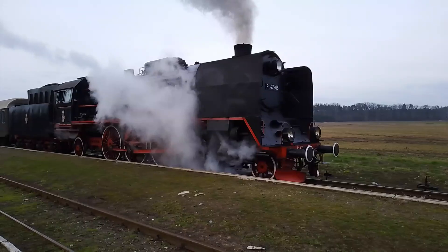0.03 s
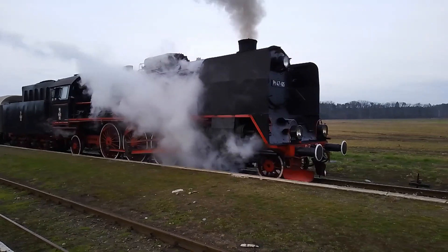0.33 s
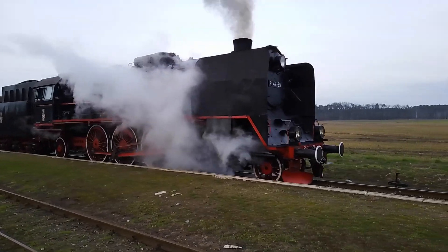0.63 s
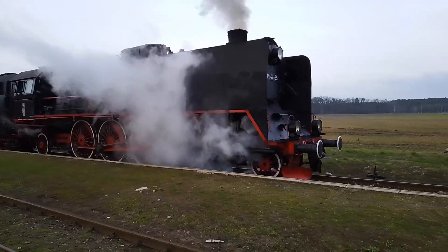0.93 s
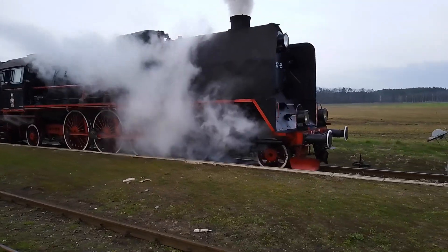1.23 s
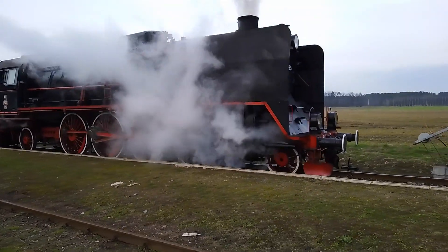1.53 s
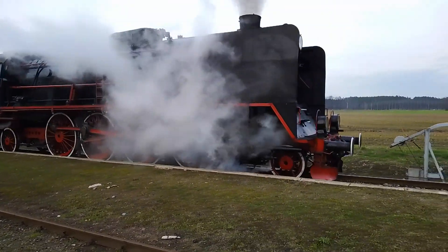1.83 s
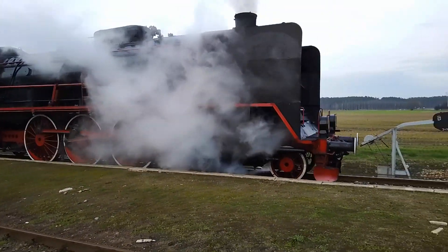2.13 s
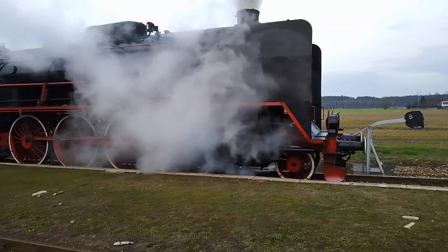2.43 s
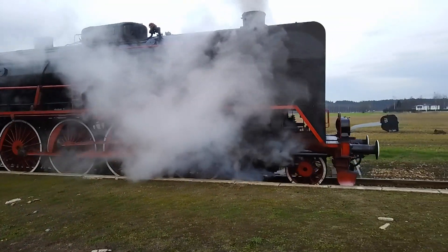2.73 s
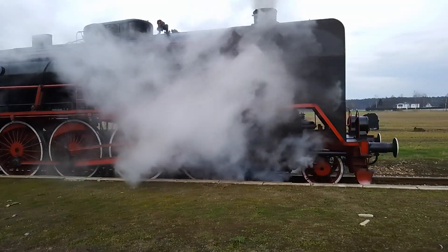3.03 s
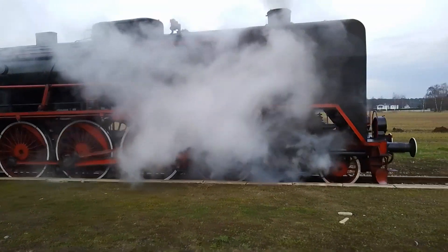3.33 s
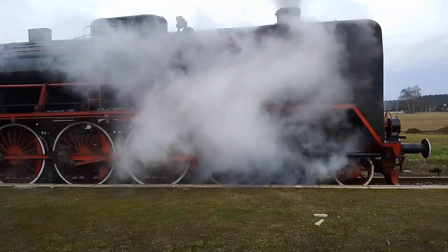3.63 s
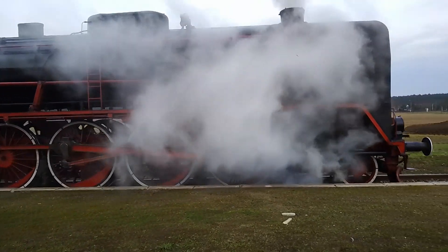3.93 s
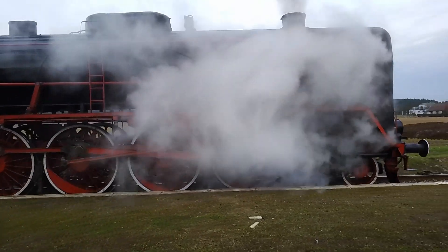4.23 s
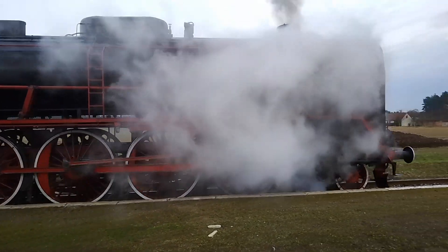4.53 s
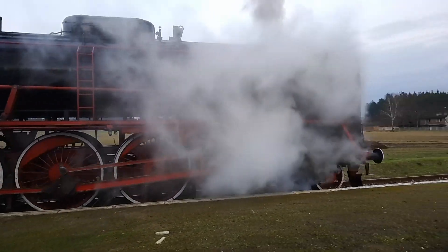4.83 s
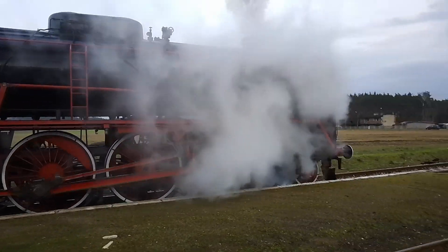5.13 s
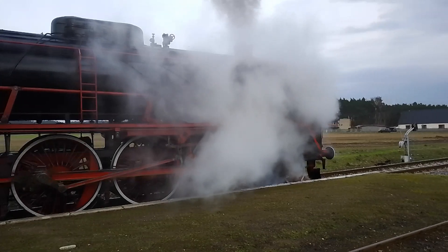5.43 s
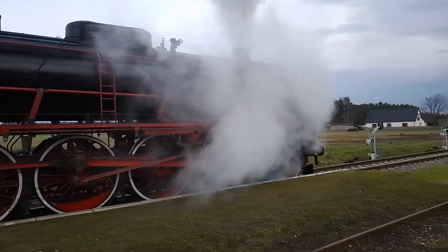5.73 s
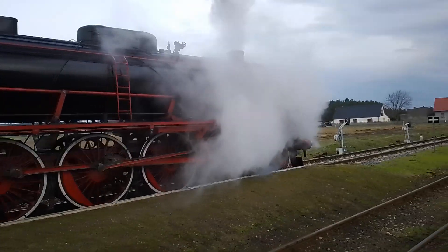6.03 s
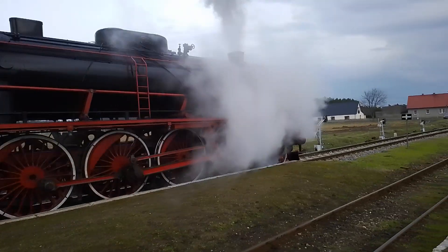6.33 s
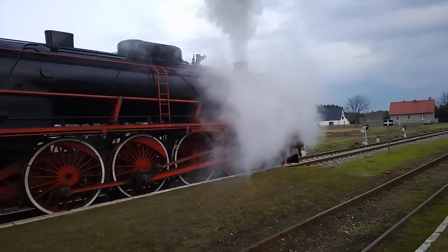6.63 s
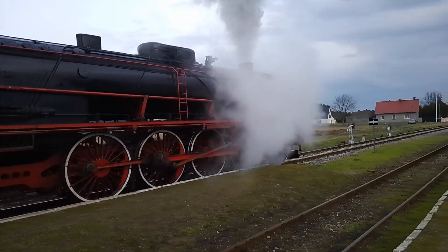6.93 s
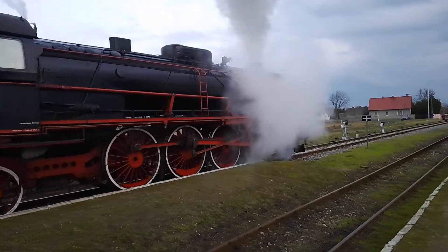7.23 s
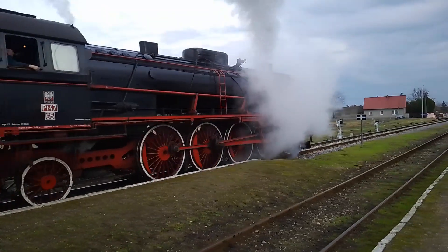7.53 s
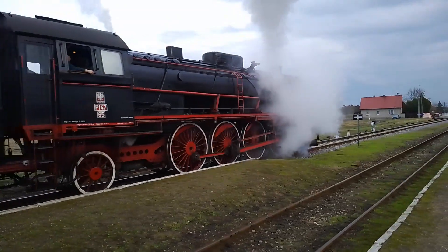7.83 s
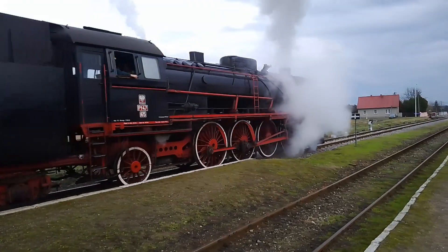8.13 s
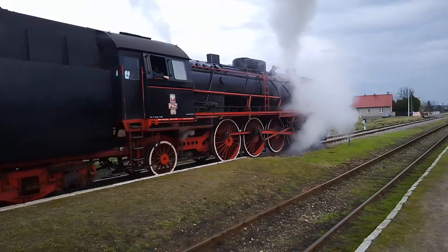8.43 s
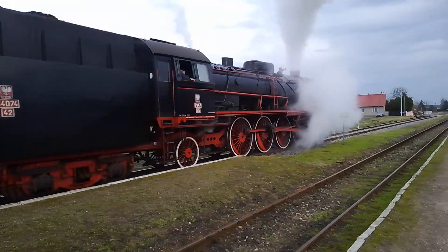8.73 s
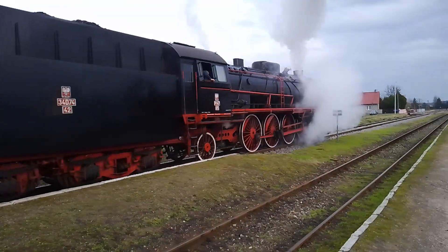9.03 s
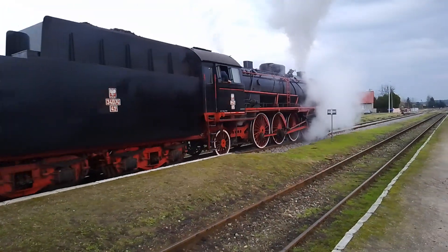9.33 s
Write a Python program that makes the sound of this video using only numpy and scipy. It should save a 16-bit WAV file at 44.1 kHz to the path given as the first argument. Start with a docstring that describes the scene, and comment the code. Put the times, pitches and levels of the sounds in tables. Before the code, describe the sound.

After silence, a shrill, sputtering hiss of steam cuts in abruptly at about 0.9 seconds, from a steam locomotive close by. At 1.2 seconds the chimney begins to chuff, each beat a low boom with a hollow bark and a slight rasp. The beats fall in slightly uneven groups of four, about two thirds of a second apart at first, quickening to about three a second by 7 seconds. The hiss pulses with each chuff and surges with a broader roar every fourth beat. Wheels and rods rumble softly underneath, strongest around 4 seconds. Small spits of steam slip between beats, for example near 4.3, 6.8 and 8.9 seconds. From about 5.5 seconds the chuffs turn boomier as the engine passes, and the hiss gradually fades and dulls, still surging. The chuffs soften from 8.6 seconds and continue to around 9.6 seconds.

```python
"""A steam locomotive pulls away past a platform with its cylinder drain cocks open. After just under a second
of silence the sound cuts in, already full of shrill hiss. The chimney starts to chuff, four uneven beats to a
turn of the wheels; the hiss pulses with each beat and surges once a turn. The beats come ever faster, with
small spits of steam between them and the running gear rumbling below. Past the middle the chimney is heard from
behind, and the hiss fades as the engine draws away."""
import sys
import numpy as np
from scipy import signal
from scipy.fft import rfft, irfft, next_fast_len
from scipy.io import wavfile
from scipy.ndimage import uniform_filter1d, map_coordinates

SR = 44100
rng = np.random.default_rng(int(sys.argv[2]) if len(sys.argv) > 2 else 0)


def to_wav(sig):
    """Store sig (one row per channel, or 1-D mono) as 16-bit WAV at the path in sys.argv[1].

    Samples outside -1..1 are clipped; the rate is SR.
    """
    pcm = np.clip(np.atleast_2d(sig), -1, 1) * 32767
    pcm = np.round(pcm).astype(np.int16)
    wavfile.write(sys.argv[1], SR, pcm.T)  # frames by channels


N = 422478
TIME = np.arange(N) / SR

# The colours of a chuff: low boom and mid bark, each from the front and from behind, and a rasp on top.
# Each row: frequency in Hz, relative level in dB.
BOOM_FRONT = [(30, -39), (70, -16.5), (100, -21), (135, -5.5), (162, -15), (186, -1.5), (240, 1.5),
              (310, 1), (355, 6.5), (400, -10.5), (520, -34)]
BOOM_REAR = [(30, -60), (70, -15), (110, -24), (140, -28), (163, -38), (195, -7), (250, 3.5), (310, 6.5),
             (355, -4), (400, -5.5), (520, -28)]
BARK_FRONT = [(330, -41), (420, -4.5), (480, 0.5), (540, 1), (605, 1), (660, -1.5), (720, 0.5),
              (790, -10.5), (880, -12.5), (1100, -48)]
BARK_REAR = [(330, -38), (420, -14), (480, -1), (530, -4), (595, -0.5), (640, 0.5), (700, 1.5), (790, -8.5),
             (880, -13), (1100, -51)]
RASP = [(750, -41), (920, -0.5), (1010, 2), (1110, 3.5), (1220, 3), (1400, -4.5), (1800, -7.5),
        (2400, -12.5), (5000, -39)]
# The chimney's ring. Each row: pitch in Hz, width in Hz, relative level in dB, loudest moment in
# seconds, spread around it in seconds.
CHIMNEY_MODES = [(347.7, 13, -6, 3.56, 1.3), (302, 57, -6, 2.4, 0.54), (191, 15, -8.5, 4.68, 0.74),
                 (234, 35, -8, 5.8, 1.14), (272, 20, -3, 6.5, 1.03), (335, 54, -2.5, 8.97, 1.16),
                 (116, 37, -21.5, 8.65, 0.77), (615, 23, -8, 6.3, 0.98), (1015, 25, -18.5, 2.3, 3.1),
                 (1197, 16, -17.5, 6.63, 0.45)]


def chimney():
    """Each blast barks and rasps at the mouth and booms longer in the smokebox."""
    boom, bark, rasp = np.zeros((3, N))
    for start, open_s, db, boom_db, rasp_db in strokes():
        slowness = (4.5 / (start + 1)) ** 0.17  # the valves move faster as the engine gains speed
        boom += amp(db + boom_db) * beat(start + .001, open_s, .025 * slowness, .08 * slowness, 1.8)
        bark += amp(db) * beat(start, open_s, .018 * slowness, .061 * slowness, sag_db=4.5)
        rasp += amp(db + rasp_db) * beat(start + .016, open_s * .92, .025, .071, sag_db=4)
    behind = np.pi / 4 * (1 + np.tanh((TIME - 5.6) / 0.42))  # the view turns from front to rear
    turning = lambda front, rear: np.cos(behind) * noise(front) + np.sin(behind) * noise(rear)
    flutter = amp(0.4 * wobble(55))  # the blast tears into puffs
    boom *= amp(0.56 * np.sin(behind))  # the smokebox booms more from behind
    boom *= amp(-3) * turning(BOOM_FRONT, BOOM_REAR) + lobes(CHIMNEY_MODES)
    bark *= amp(-1.1) * turning(BARK_FRONT, BARK_REAR)
    rasp *= amp(-1.64) * patchy(noise(RASP), depth_db=4)
    return flutter * (boom + bark + rasp)


# The quickening exhaust beats. Each row: start in seconds, relative level in dB.
CHUFFS = [(1.226, -21), (1.88, -20), (2.502, -21), (3.078, -19), (3.614, -19), (4.074, -20.5), (4.534, -20),
          (4.981, -19.5), (5.42, -19.3), (5.803, -20), (6.18, -20), (6.572, -19.8), (6.96, -18.5),
          (7.291, -21), (7.637, -21.5), (7.984, -19), (8.336, -20), (8.646, -24), (8.957, -24.5),
          (9.28, -24), (9.607, -23)]
# The four strokes of a wheel turn, set unevenly by the valves. Each row: open time in seconds at the
# usual gap between beats, boom trim in dB, rasp trim in dB.
STROKES = [(.11, -1.5, -6), (0.094, -1, -6.5), (0.088, 0.17, -6.5), (0.072, -0.3, -6)]
USUAL_GAP_S = 0.42


def strokes():
    """The valves' rhythm: start, open time, level, boom trim and rasp trim for every beat."""
    starts, levels_db = np.transpose(CHUFFS)
    open_s, boom_db, rasp_db = np.transpose([STROKES[k % len(STROKES)] for k in range(len(starts))])
    open_s = open_s * (np.gradient(starts) / USUAL_GAP_S) ** 0.64  # slow beats stay open longer
    rasp_db = rasp_db - 0.15 * starts  # the rasp fades as the chimney turns away
    return list(zip(starts, open_s, levels_db, boom_db, rasp_db))


def beat(start, open_s, rise_s, fall_s, sag_db):
    """The envelope of one stroke: the valve slides open, the pressure sags, the blast dies away."""
    age = TIME - start
    opening = .5 + .5 * np.tanh(0.73 * (age / rise_s + 0.9))
    sag = amp(sag_db * (.5 - np.clip(age / open_s, 0, 1)))
    dying = np.exp(-np.maximum(age - open_s, 0) / fall_s)
    return opening * sag * dying


# The colours of the jets: piercing hiss, broad roar and airy spray.
# Each row: frequency in Hz, relative level in dB.
SHRILL = [(4500, -48), (5600, -20.5), (6700, -14), (8000, -11.5), (8700, -7), (9150, -3), (9500, -3),
          (9800, -4), (10150, -5), (10800, -10), (11600, -16.5), (13000, -29)]
ROAR = [(300, -2.5), (800, -6), (1400, 0.5), (2000, 0), (2700, -0.5), (3600, 0.5), (5000, -2.5),
        (6500, -7.5), (9000, -1), (13000, -34)]
SPRAY = [(7000, -35), (11000, -26), (12300, 0.5), (14000, -2), (15000, -4.5), (16000, 3)]
# The nozzles' ring. Each row: pitch in Hz, width in Hz, relative level in dB, loudest moment in
# seconds, spread around it in seconds.
NOZZLE_MODES = [(1850, 100, -23.5, 4.5, 2.9), (2750, 550, -17, 2.95, 0.4), (3490, 150, -22.5, 2.9, 2.3),
                (3740, 270, -20, 5.04, 0.29), (4190, 140, -24, 4.15, 0.27), (5250, 1700, -16, 1.7, 0.48),
                (6570, 610, -18, 6.7, 1.5), (8770, 140, -8, 1, .4), (9300, 220, -8, 1.2, 0.5),
                (10260, 320, -9.5, 2.2, 0.8), (9610, 340, -4, 4.06, 0.27), (9100, 220, -12, 4.4, 0.28),
                (9160, 410, -6, 10, 1.8)]


def drain_cocks():
    """Wet steam shrills in the narrow nozzles, roars as it spreads and throws a fine spray."""
    hiss_db = cock_level()
    nozzles = amp(-0.27) * patchy(noise(SHRILL), depth_db=1.47) + lobes(NOZZLE_MODES)
    shrill = amp(hiss_db - 0.25) * nozzles
    # the louder the hiss, the brighter it sounds: the roar follows it less, the top treble slightly more
    roar_db = 0.73 * hiss_db - 16.5 + surge()  # the surge widens the jet
    roar = amp(roar_db) * patchy(noise(ROAR), depth_db=1.32)
    shade_db = 3 * np.maximum(TIME - 6.3, 0)  # the top treble fades as the cylinders draw away
    spray = amp(1.07 * hiss_db - 10 - shade_db) * patchy(noise(SPRAY), depth_db=1.5)
    sputter = amp(0.4 * wobble(30) + 0.3 * wobble(170))  # slugs of water break up the jets
    return sputter * (shrill + roar + spray)


# The steady leak as the cocks come near and draw away. Each row: time in seconds, relative level in dB.
LEAK_LEVELS = [(.9, -23.5), (2.6, -22.5), (3.4, -22.5), (4.2, -23), (5, -25), (5.8, -25.5), (7.3, -30.5),
               (8.6, -34.5), (9.5, -39.5)]


def cock_level():
    """The hiss's drive in dB: a steady leak that surges with the crank, and a pulse on every beat."""
    surge_db = 1.73 + 0.86 * TIME  # the surge grows as the jet swings toward the listener
    leak = amp(curve(LEAK_LEVELS) + surge_db * surge())
    pulses = sum(beat(start + .011, open_s, rise_s=.025, fall_s=.037, sag_db=4)
                 for start, open_s, *_ in strokes())
    return 20 * np.log10(np.hypot(leak, amp(-26.5) * pulses))


def surge(lag_beats=.27, rise_beats=.19, length_beats=2.7):
    """Once a turn the near cylinder fills quickly and empties slowly: a swell between 0 and 1."""
    starts = np.transpose(CHUFFS)[0]
    beat_count = np.interp(TIME, starts, np.arange(len(starts)))
    age_beats = (beat_count - lag_beats) % len(STROKES)
    return np.minimum(age_beats / rise_beats, 1) * np.maximum(1 - age_beats / length_beats, 0)


# Spits and puffs between the beats. Each row: start in seconds, open time in seconds, centre in Hz,
# width in Hz, level in dB.
PUFFS = [(2.39, 0.068, 334, 250, -37.5), (4.268, 0.098, 1744, 650, -32.5), (5.292, 0.014, 600, 500, -36),
         (6.392, 0.024, 796, 300, -35), (6.78, .07, 9700, 2000, -27), (8.458, .07, 3940, 900, -42),
         (8.869, 0.021, 648, 500, -29.5)]


def puffs():
    """Short bursts of escaping steam, each swelling a little before it stops."""
    return sum(amp(db) * beat(start, open_s, rise_s=.0096, fall_s=.013, sag_db=-4) * resonance(hz, width)
               for start, open_s, hz, width, db in PUFFS)


# The running gear rolling by. Each row: time in seconds, level in dB.
GEAR_LEVELS = [(1, -47), (2.4, -37.5), (3.3, -42), (4.2, -32.5), (5.1, -39), (5.7, -35.5), (6.7, -38.5),
               (8.6, -36.5), (9.5, -41.5)]
# The colour of its rumble. Each row: frequency in Hz, relative level in dB.
RUMBLE = [(20, -38), (60, -16.5), (125, -9.5), (160, -12.5), (190, -4), (275, 2), (350, -3), (420, -5),
          (540, -6.5), (680, -1.5), (950, -8.5), (1300, -10.5), (2000, -13), (3500, -20)]


def running_gear():
    """Wheels and rods rumble unevenly along the rails."""
    return amp(curve(GEAR_LEVELS) + 0.33 * wobble(22)) * patchy(noise(RUMBLE), depth_db=3)


def lobes(modes):
    """Resonances beam out in lobes that sweep over the listener: each swells and fades in passing."""
    return sum(amp(db) * np.exp(-.5 * ((TIME - peak_s) / spread_s) ** 2) * resonance(hz, width)
               for hz, width, db, peak_s, spread_s in modes)


def resonance(hz, width_hz):
    """Turbulence of rms 1 ringing in one resonance."""
    return turbulence(lambda f: 1 / (1 + ((f - hz) / (0.54 * width_hz)) ** 2))


def noise(spectrum):
    """Turbulence of rms 1, coloured by rows of frequency in Hz and level in dB."""
    hz, db = np.transpose(spectrum)
    return turbulence(lambda f: amp(np.interp(np.log(f + 1), np.log(hz), db, left=-120, right=-120)))


def turbulence(response):
    """White noise shaped by a frequency response, at rms 1."""
    size = next_fast_len(N + 8192)
    white = rfft(rng.standard_normal(N), size)
    return unit(irfft(white * response(np.fft.rfftfreq(size, 1 / SR)), size)[:N])


def patchy(sound, depth_db):
    """Eddies in the steam cloud brighten and shade patches of the spectrum."""
    spectrogram = signal.stft(sound, nperseg=512)[2]
    eddies = uniform_filter1d(rng.standard_normal(spectrogram.shape), size=4, axis=0)  # across pitch
    eddies = uniform_filter1d(eddies, size=16, axis=1)  # across time
    return unit(signal.istft(spectrogram * amp(depth_db * unit(eddies)), nperseg=512)[1][:N])


def wobble(rate):
    """A smooth random curve, rate knots a second."""
    return map_coordinates(rng.standard_normal(int(N * rate / SR) + 4), [TIME * rate])


def curve(rows):
    """A fader ride through rows of time and level, one value per sample."""
    return np.interp(TIME, *np.transpose(rows))


def amp(db):
    """Decibels to gain."""
    return 10 ** (np.asarray(db) / 20)


def unit(x):
    """Scaled to rms 1."""
    return x / np.sqrt(np.mean(x ** 2) + 1e-20)


def scene():
    """The whole engine, alike in both channels."""
    engine = chimney() + drain_cocks() + puffs() + running_gear()
    return np.array([engine, engine])


START_S, TOP_HZ = .89, 15750


def record(dry):
    """The sound cuts in out of silence, with the very top of the treble shaved off."""
    gate = np.clip((TIME - START_S) / .002, 0, 1)
    low_pass = signal.ellip(12, .05, 100, TOP_HZ, fs=SR, output="sos")
    return signal.sosfilt(low_pass, dry * gate)


dry = scene()
out = record(dry)
to_wav(out)
```